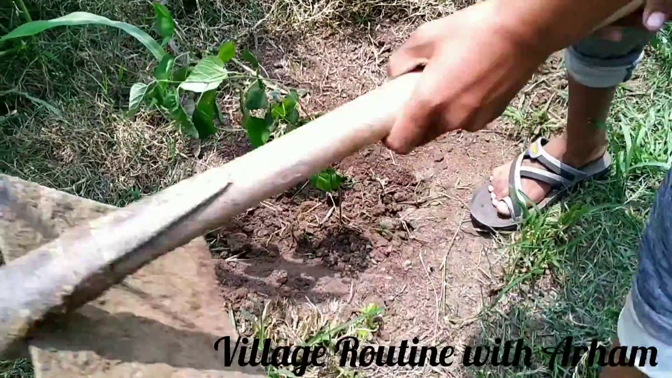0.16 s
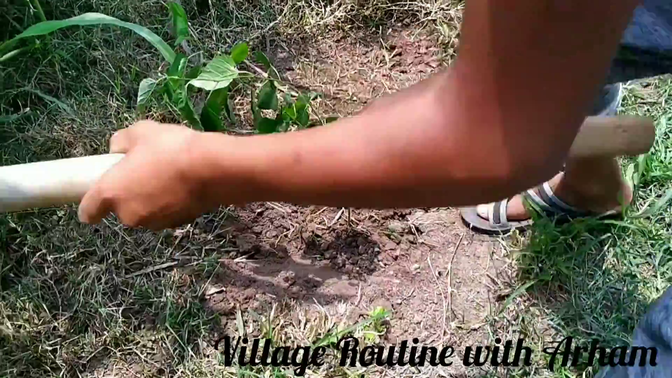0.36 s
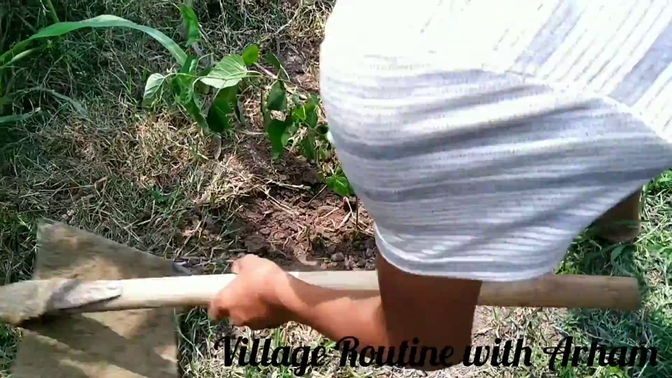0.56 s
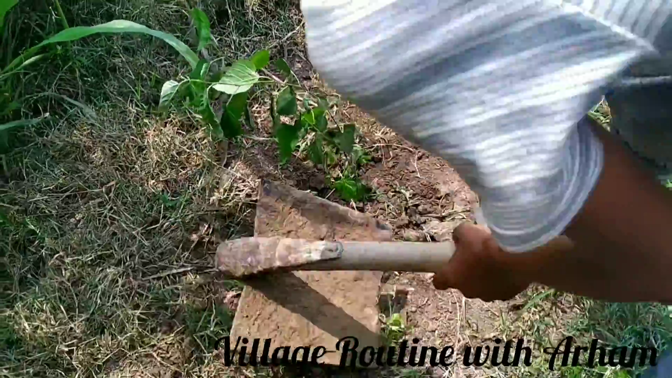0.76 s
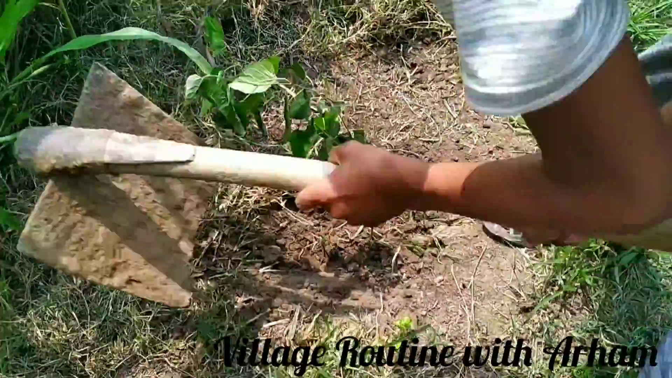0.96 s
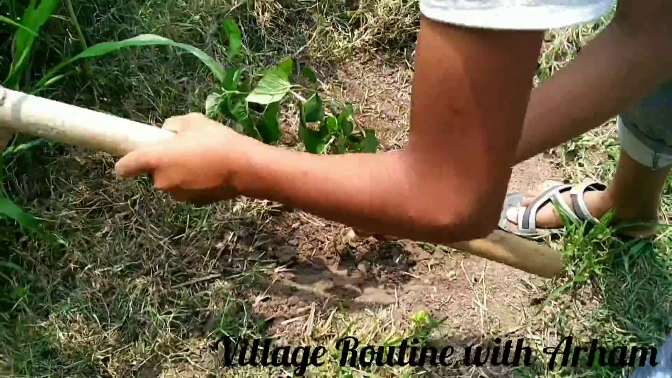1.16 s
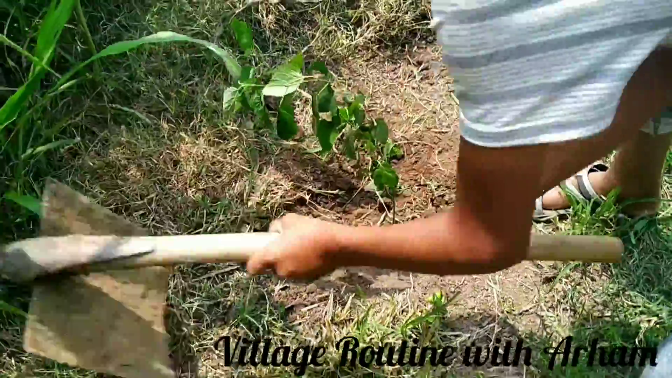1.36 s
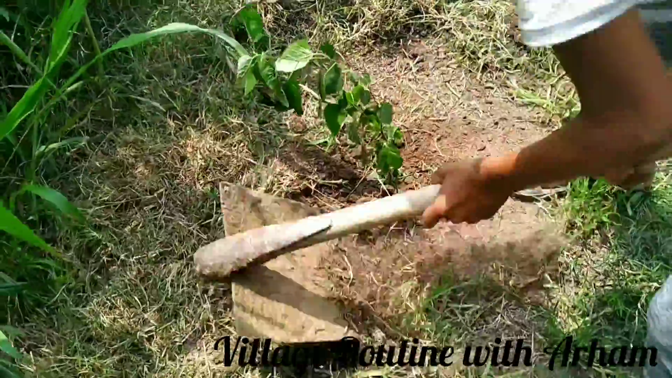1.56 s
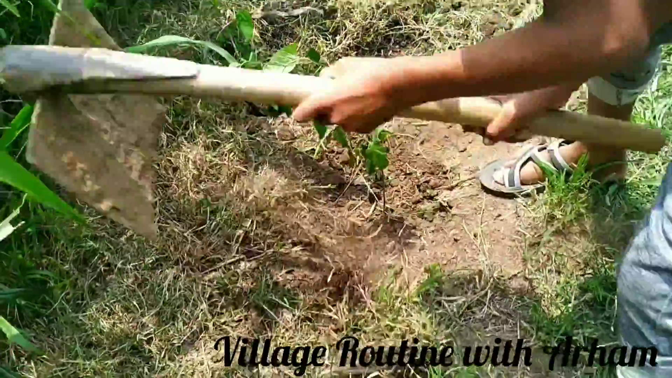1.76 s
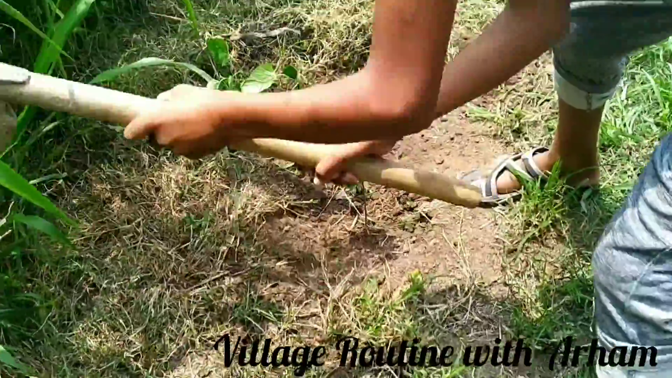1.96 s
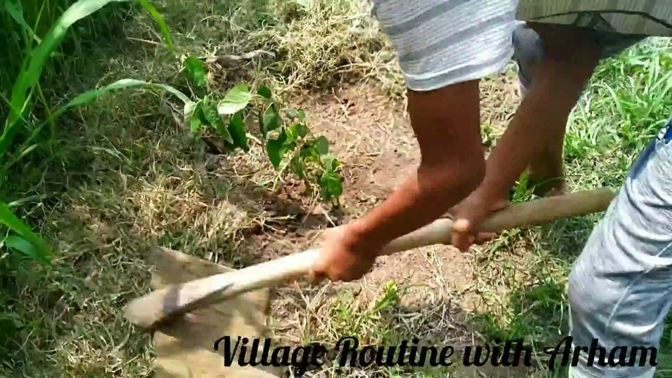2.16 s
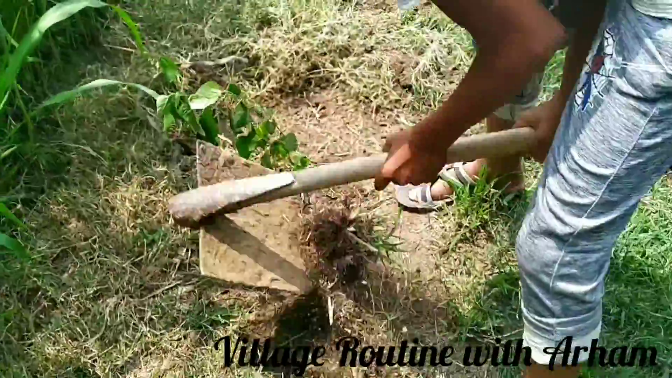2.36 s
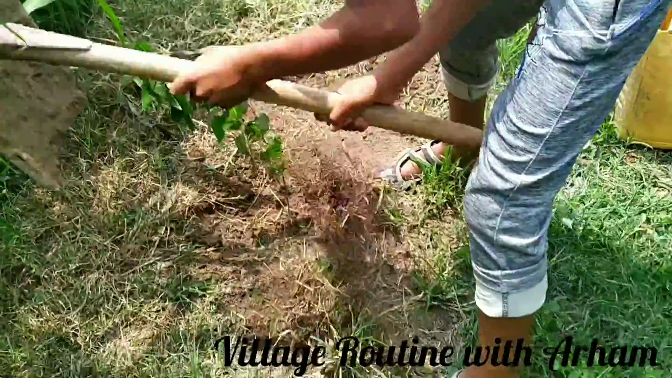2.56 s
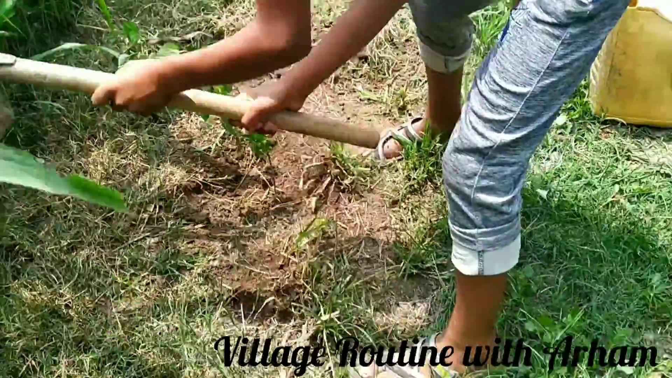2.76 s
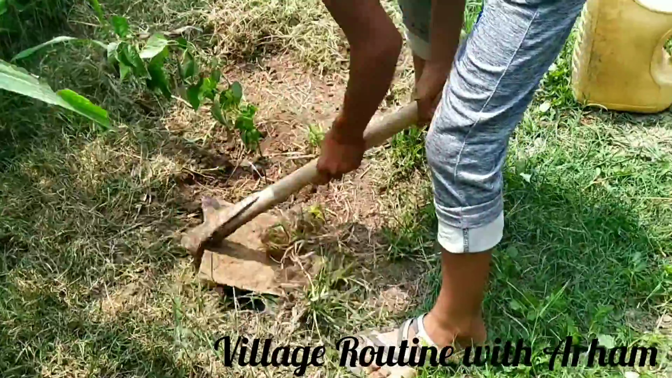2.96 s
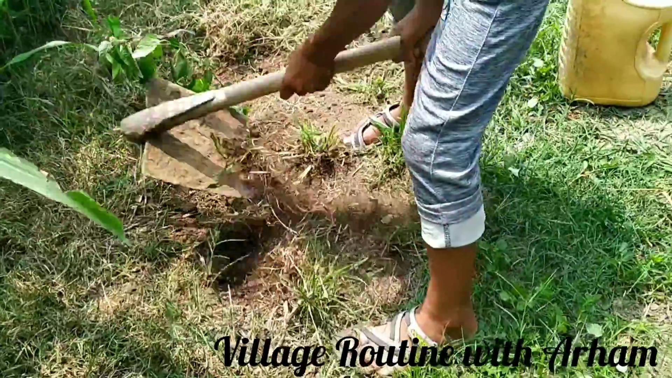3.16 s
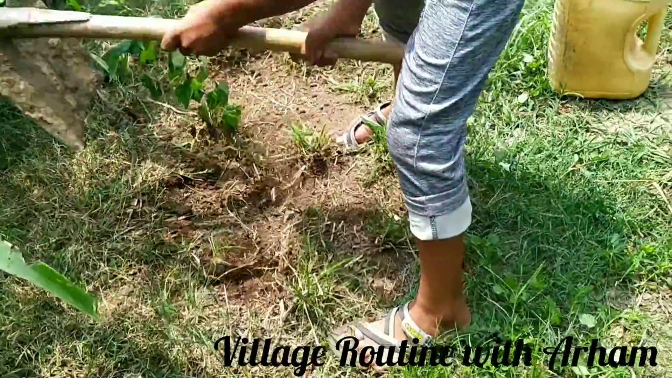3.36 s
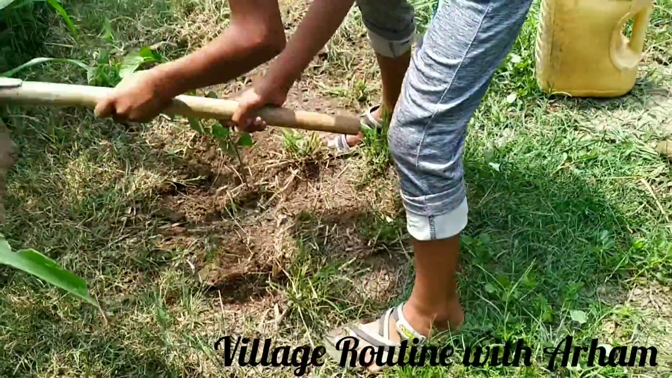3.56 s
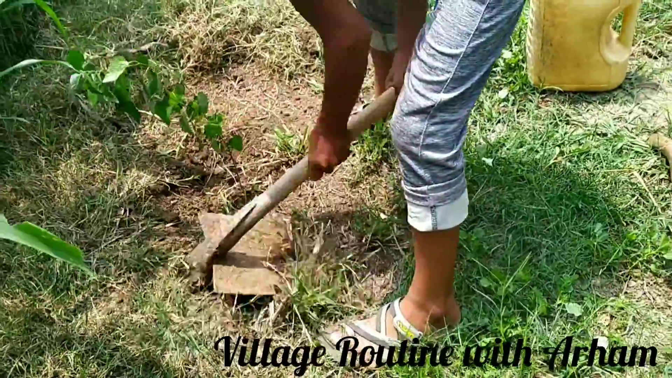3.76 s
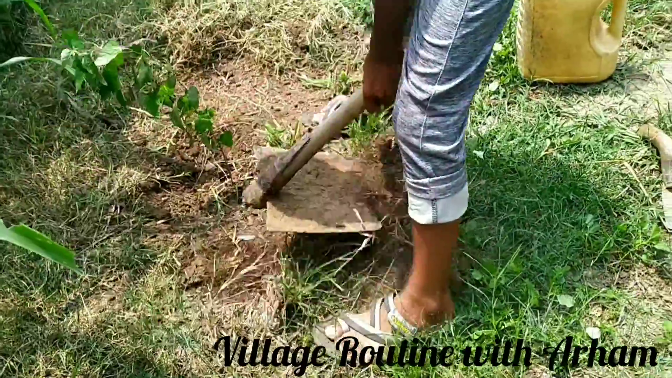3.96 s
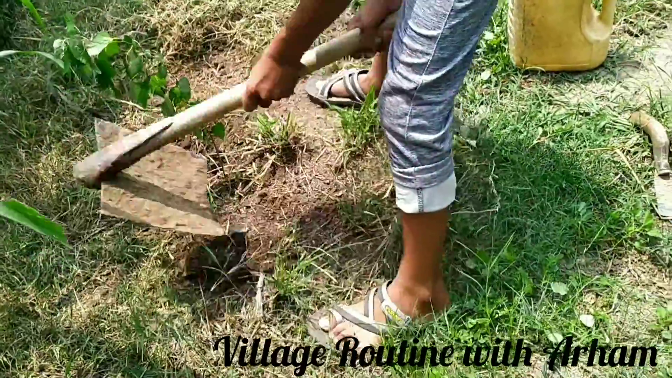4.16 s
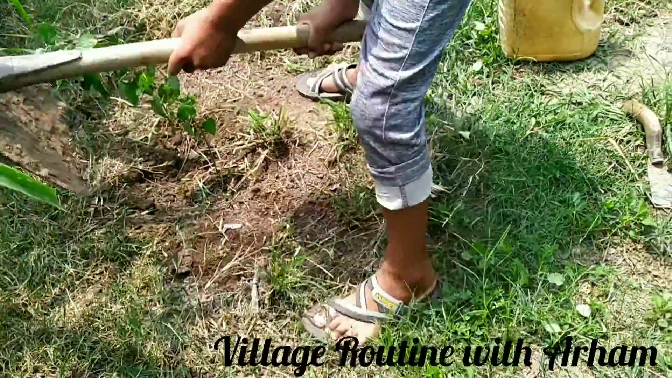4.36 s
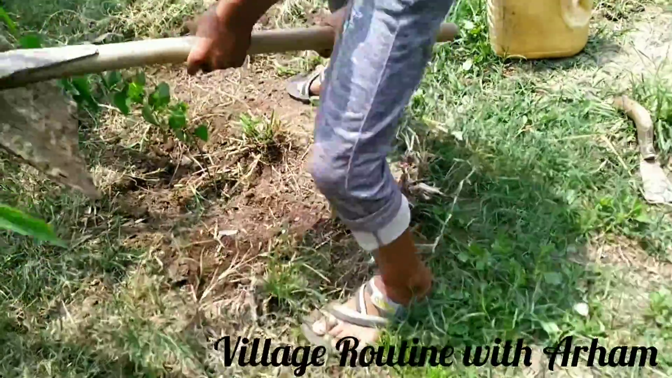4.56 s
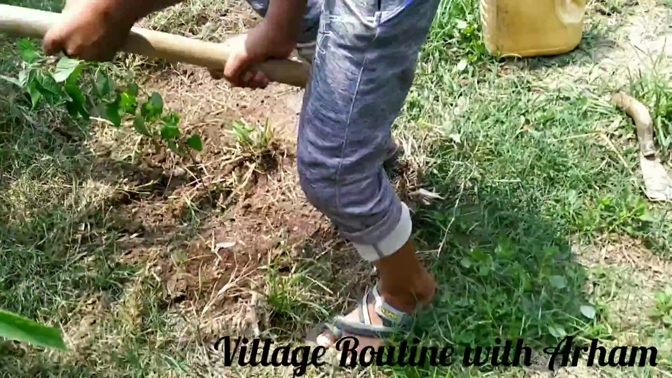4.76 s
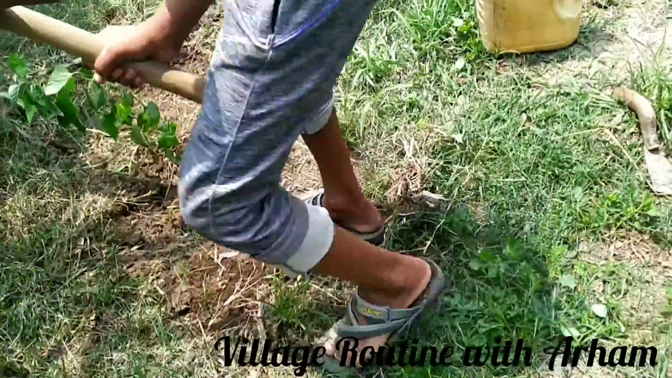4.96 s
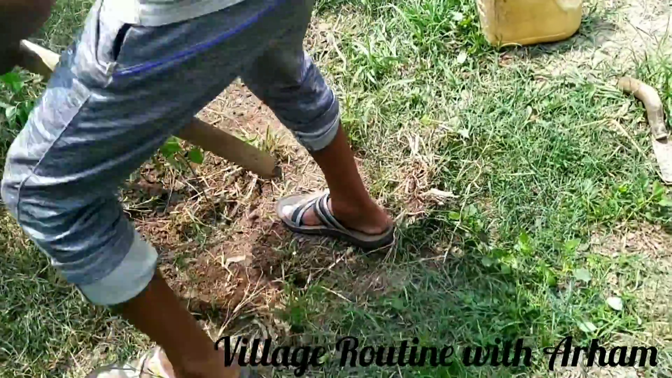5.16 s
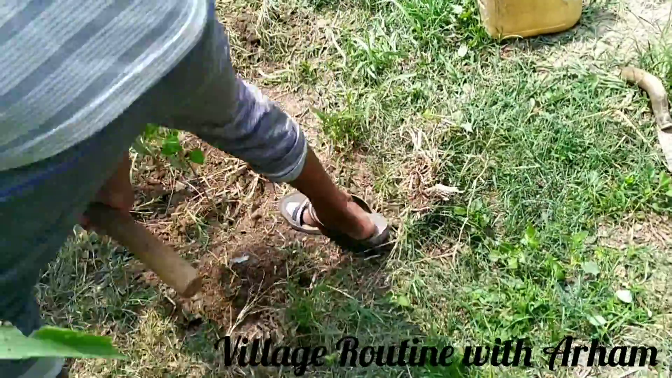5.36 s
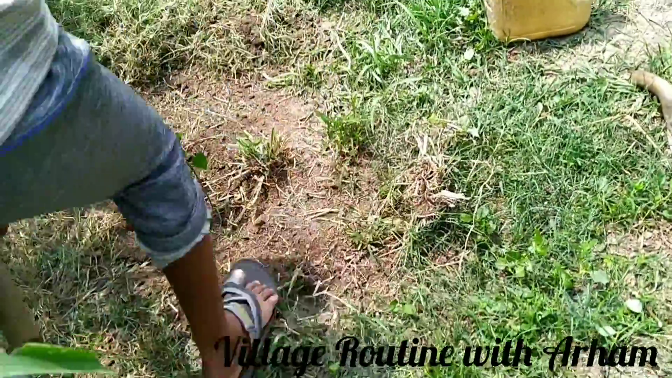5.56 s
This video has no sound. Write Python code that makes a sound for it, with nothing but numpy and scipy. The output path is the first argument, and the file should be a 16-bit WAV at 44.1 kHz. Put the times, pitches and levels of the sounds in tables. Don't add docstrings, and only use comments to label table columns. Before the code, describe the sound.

Five sharp hoe strokes crunch into dry earth outdoors, with crumbs pattering, grit sliding off the blade, and a distant pump engine chugging low.

```python
import sys
import numpy as np
from scipy import signal
from scipy.io import wavfile
from scipy.ndimage import uniform_filter1d

SR = 44100
rng = np.random.default_rng(int(sys.argv[2]) if len(sys.argv) > 2 else 0)


def ratio(d):
    e = np.asarray(d, float) / 20
    return 10 ** e


def int16_out(signal):
    q = np.round(np.clip(np.atleast_2d(signal).T, -1, 1) * 32767)
    wavfile.write(sys.argv[1], SR, q.astype(np.int16))


N = 246959
TIME = np.arange(N) / SR

# peak in seconds, grit level in dB,
# weight (lumps over grit) in dB, rise in ms per 10 dB.
CUTS = [
    (0.647, -24, -10, 8.5),
    (1.454, -28.5, -15, 10),
    (2.224, -26, -9, 17),
    (2.968, -39.5, -12, 26),
    (3.784, -27, -11.5, 12),
]
CUT_FALL_MS = 45.6
# peak in seconds, grit level in dB, weight in dB,
# rise in ms per 10 dB, fall in ms per 10 dB.
STOPS = [
    (0.663, -21, -11, 13.5, 22.5),
    (1.485, -15, -11.5, 15, 15.5),
    (2.246, -15, -11, 9, 19),
    (2.997, -16.5, -7, 9, 16),
    (3.807, -17, -13, 9.5, 17.5),
]
# peak in seconds, grit level in dB, weight in dB,
# rise in ms per 10 dB, fall in ms per 10 dB.
PRIES = [
    (.705, -33, -6.5, 22, 34),
    (1.534, -29, -5, 7, 24.5),
    (2.266, -21.5, -4, 25.5, 13.5),
    (3.037, -24.5, -7.5, 4, 20.5),
    (3.823, -27, -6.5, 13, 8),
]
SPILL_LATE_S, SPILL_DB, SPILL_WEIGHT_DB, SPILL_RISE_MS, SPILL_FALL_MS = 0.037, -17, -19, 5.7, 30
# peak in seconds, grit level in dB, weight in dB, fall in ms per 10 dB (below zero means as short as
SCUFFS = [(2.269, -20, -5, -1), (2.6, -42, -18, 7), (.36, -46, -3, 33), (0.384, -37.5, 2.5, 12.5),
          (.446, -45, -10, 15), (1.098, -40.5, -17, 31), (1.256, -46, -2.5, 7), (1.358, -39, -13, -1),
          (1.948, -53, 1, 15), (4.415, -44.5, -5.5, 39), (4.454, -43.5, -3.5, 29), (4.81, -34, -11, 3),
          (4.837, -43, -21, 13), (4.889, -37.5, -3.5, 12.5), (5.298, -36.5, -17, 46), (5.554, -39, -16, 27)]
SCUFF_RISE = 0.93
# start in seconds, level in dB, ground note in Hz, swell in ms.
THUDS = [(0.38, -33.5, 364, 1.4), (.658, -23, 528, 2.5), (.662, -26, 800, 4.4), (1.48, -20.5, 393, 1.84),
         (1.484, -31.5, 560, 10.7), (1.484, -22.5, 697, 6), (2.244, -19.5, 560, 8.8),
         (2.265, -36, 412, 1.5), (2.993, -25.5, 373, 7.1), (2.995, -26, 560, 4.5), (3.789, -30.5, 110, 5),
         (3.797, -26.5, 560, 5.6), (3.798, -22.5, 343, 2.7), (4.886, -43, 452, 3.1)]
# frequency in Hz, level in dB.
GRIT = [(1060, -65.5), (1800, -37), (2500, -9.5), (3800, -4), (5900, -4), (7600, 1), (9150, -4),
        (10000, -8), (11500, -12.5), (13900, -7), (15600, -6.5), (17000, -42)]
# frequency in Hz, width in Hz, level in dB.
CLOD = [(342, 294, -7), (560, 158, -7.5), (775, 185, -7)]
# frequency in Hz, width in Hz, level in dB.
CRUSH = [(1285, 790, -1), (1460, 126, -4.5), (2036, 810, -8.5), (2480, 430, -8)]
CRUST_SHARE, CRUST_DB = 0.87, 2
# frequency in Hz, time to fall 60 dB in seconds.
BLADE = [(380, .3), (537, .4)]
# start in seconds, level of the low note in dB, level of the high note in dB.
RINGS = [
    (.7, -39, -38),
    (1.53, -40.5, -39.5),
    (2.29, -47.5, -44),
    (3.041, -53, -52),
    (3.819, -54, -57),
]
# start in seconds, length in seconds, level in dB, steel note in Hz.
SLIDES = [
    (3.272, 0.24, -51, 1920),
    (3.438, 0.24, -49.5, 3700),
    (3.864, 0.33, -46, 3610),
    (4.194, 0.17, -58.5, 1860),
    (4.323, 0.33, -49.5, 3580),
]
SLIDE_SAG, SLIDE_LEFT = 0.015, 1
SLIDE_WIDTH_HZ, SLIDE_PEAK = 400, 1.35
UPPER_RATIO, UPPER_WIDTH_HZ, UPPER_DB = 1.45, 3200, 2.5
# time in seconds, patter level in dB.
RUSTLE = [(0, -60), (.05, -83), (.28, -64), (.36, -47), (.6, -55), (1.08, -48), (1.28, -55.5),
          (1.73, -45.5), (1.91, -56), (2.45, -47.5), (3.45, -45.5), (3.7, -52), (4.05, -45), (4.27, -53),
          (4.45, -45.5), (5.07, -51.5), (5.35, -48), (5.6, -42.5)]
# frequency in Hz, level in dB.
RUSTLE_TONE = [(150, -12), (300, -13), (700, -5.5), (1300, -3.5), (2500, 0.5), (4600, -4), (7900, -0.5),
               (9300, -5), (10500, -12.5), (13000, -8.5), (15700, -3.5), (17000, -51)]
EVEN_DB, TILT_DB, TILT_PER_DB = -49.5, 1.5, -0.68
# time in seconds, level in dB.
INSECT = [(0, -58.5), (.25, -56.5), (.48, -47), (.6, -57), (1.36, -46), (1.75, -63), (2.01, -50),
          (2.67, -46.5), (3.02, -72), (3.2, -51.5), (3.6, -58), (3.77, -55), (3.94, -65), (4.15, -60),
          (4.7, -52), (5.2, -52), (5.46, -52), (5.6, -46)]
INSECT_HZ, INSECT_WIDTH_HZ = 8100, 750
# time in seconds, firings a second.
FIRING = [(0, 9.21), (1.8, 9.2), (2.4, 9.15), (3.6, 9.17), (5.6, 9.2)]
FIRST_TURN = .09
# frequency in Hz, level in dB.
EXHAUST = [(15, -67), (25, -47), (37, -22), (53, -5), (70, -4.5), (97, 0), (129, -0.5), (145, -10),
           (165, -15.5), (200, -11), (235, -16), (320, -18), (420, -42), (700, -82)]
# time in seconds, level in dB.
ENGINE = [(0, -46.5), (2.1, -46.5), (3.9, -48), (5.6, -47)]
# frequency in Hz, width in Hz, level in dB.
PIPE = [(73.4, 1.5, -9), (120, 3, -14), (128.5, 3, -14), (197, 6, -24)]
# frequency in Hz, level in dB.
AIR = [(150, -23), (300, -22.5), (600, -27.5), (1200, -32), (3800, -29.5), (9500, -37.5), (10300, -42),
       (16000, -40)]
AIR_DB = -54.5
# frequency in Hz, likeness from 0 to 1.
NEAR_SAME = [(60, 1), (500, 1), (900, 0.7), (1500, 0.55), (4000, 0.71), (15000, 0.33)]
# frequency in Hz, likeness from 0 to 1.
FAR_SAME = [(60, 0.96), (200, .86), (550, 0.51), (1500, 0.21), (6000, 0.93), (9000, 0.48), (15000, .4)]
# frequency in Hz, left over right in dB.
LEFT_PORT = [(100, .3), (500, 1.4), (1300, -.6), (2500, -1.2), (4500, -1.5), (7300, -.5), (10500, -6),
             (14000, -1)]
GAP_SHARE, GAP_DB, GAP_FROM_HZ = .045, -30, 1500


def evened(x):
    return x / np.sqrt(np.mean(x ** 2) + 1e-20)


def read(points, hz):
    f, value = np.transpose(points)
    return np.interp(np.log(hz + 1), np.log(f + 1), value)


def curve(rows):
    t, value = np.transpose(rows)
    return np.interp(TIME, t, value)


def colour(x, points):
    half = np.log(ratio(np.maximum(read(points, np.fft.rfftfreq(16384, 1 / SR)), -100)))
    full = np.concatenate([half, half[-2:0:-1]])
    taps = np.fft.ifft(np.exp(np.conj(signal.hilbert(full)))).real[:8192]
    taps = taps.reshape((1,) * (x.ndim - 1) + (-1,))
    return signal.oaconvolve(x, taps, axes=-1)[..., :N]


def resonate(x, hz, width):
    return signal.lfilter(*signal.iirpeak(hz, hz / width, SR), x)


def grainy(per_s, spread_db, hiss):
    size = ratio(spread_db * np.minimum(rng.exponential(1, (2, N)), 4))
    struck = rng.random((2, N)) < per_s / SR
    cracks = evened(size * rng.standard_normal((2, N)) * struck)
    return evened(cracks + hiss * rng.standard_normal((2, N)))


def flicker(ms):
    size = int(ms * SR / 1000)
    return evened(uniform_filter1d(uniform_filter1d(rng.standard_normal(N), size), size))


def all_pushes():
    cuts = [(*row, CUT_FALL_MS) for row in CUTS]
    spills = [(s + SPILL_LATE_S, db + SPILL_DB, SPILL_WEIGHT_DB, SPILL_RISE_MS, SPILL_FALL_MS)
              for s, db, *_ in PRIES]
    scuffs = [(s, db, weight_db, SCUFF_RISE * ms, ms) for s, db, weight_db, ms in SCUFFS]
    return cuts + list(STOPS) + list(PRIES) + spills + scuffs


def pushes(share):
    power = np.zeros(N)
    for s, db, weight_db, rise_ms, fall_ms in all_pushes():
        i = slice(max(int((s - .2) * SR), 0), int((s + .3) * SR))
        ms = (TIME[i] - s) * 1000
        slope = np.minimum(ms / max(rise_ms, .5), -ms / max(fall_ms, .5))
        power[i] += ratio(2 * (db + share * weight_db + 10 * slope))
    return np.sqrt(power)


def soil():
    shiver = ratio(1.6 * flicker(3))
    grit = evened(colour(grainy(7000, 2.5, 1.0), GRIT))
    crust = sum(ratio(db) * resonate(grainy(1500, 3.1, 0.67), hz, w) for hz, w, db in CRUSH)
    clods = np.zeros((2, N))
    for hz, w, db in CLOD:
        lump = resonate(grainy(700, 2.5, .5), hz, w)
        clods += ratio(db) * resonate(lump, hz, 1.26 * w)
    sound = grit * pushes(0) * shiver
    sound += ratio(CRUST_DB) * evened(crust) * pushes(CRUST_SHARE) * shiver
    return sound + ratio(-2.0) * evened(clods) * pushes(1)


def thuds():
    out = np.zeros(N)
    for s, db, hz, ms in THUDS:
        t = np.maximum(TIME - s, 0)
        swell = t * 1000 / ms
        out += ratio(db + 2) * np.sin(2 * np.pi * hz * t) * swell * np.exp(.5 - swell ** 2 / 2)
    return out


def blade():
    out = np.zeros(N)
    clinging_db = 5 * flicker(7) - 3.5
    for s, *levels_db in RINGS:
        t = np.maximum(TIME - s, 0)
        onset = 1 - np.exp(-t / 0.0014)
        for db, (hz, t60) in zip(levels_db, BLADE):
            out += ratio(db - 60 * t / t60 + clinging_db) * np.sin(2 * np.pi * hz * t) * onset
    return out


def hoe():
    sound = soil()
    sound[0] += thuds() + blade()
    return ports(sound, NEAR_SAME, lag_ms=0.2745, sway_ms=0.088, echo_db=1.5, drift_ms=0.1155, corner_hz=1040)


def slides():
    grains = grainy(2500, 3.8, 1.0)
    out = np.zeros((2, N))
    for s, length, db, hz in SLIDES:
        i = slice(int(s * SR), int((s + length) * SR))
        part = grains[:, i]
        along = np.linspace(0, 1, part.shape[1])
        turn = np.exp(2j * np.pi * np.cumsum(hz * (1 - SLIDE_SAG * along)) / SR)
        narrow = (turn * signal.lfilter(*signal.butter(2, SLIDE_WIDTH_HZ / 2, fs=SR), part / turn)).real
        upper_hz = hz * UPPER_RATIO
        wide = resonate(resonate(part, upper_hz, UPPER_WIDTH_HZ), upper_hz, 2 * UPPER_WIDTH_HZ)
        arch = np.sin(np.pi * along ** SLIDE_PEAK) ** 0.63
        out[:, i] += ratio(db) * arch * (evened(narrow) + ratio(UPPER_DB) * evened(wide))
    out[1] = SLIDE_LEFT * out[0] + 1.04 * out[1]
    return out * ratio(0.6 * flicker(12))


def rustle():
    patter = evened(colour(grainy(1800, 3.0, 1.7), RUSTLE_TONE))
    low = signal.sosfilt(signal.butter(2, 2500, fs=SR, output="sos"), patter)
    busy_db = curve(RUSTLE)
    patter = patter + low * (ratio(TILT_DB + TILT_PER_DB * (busy_db - EVEN_DB)) - 1)
    return patter * ratio(busy_db + 1.3 * flicker(25) + 1.2 * flicker(6) + 1.1)


def insect():
    buzz = resonate(rng.standard_normal((2, N)), INSECT_HZ, INSECT_WIDTH_HZ)
    buzz = resonate(buzz, INSECT_HZ, INSECT_WIDTH_HZ)
    return evened(buzz) * ratio(curve(INSECT) + 3.2 * flicker(16) - 1.5)


def engine():
    turns = FIRST_TURN + np.cumsum(curve(FIRING)) / SR
    size = ratio(1.8 * rng.standard_normal((60, 3)))[turns.astype(int)].T
    firing = np.diff(np.floor(turns), prepend=0) * size[0]
    valves = np.zeros(N)
    for knock_size, at in zip(size[1:], (.5, .76)):
        valves += np.diff(np.floor(turns + at), prepend=0) * knock_size
    pulses = evened(firing + .18 * valves) * [[1], [0]]
    pulses = signal.sosfilt(signal.butter(2, 190, fs=SR, output="sos"), pulses)
    roll = rng.standard_normal((2, N)) * ratio(2 * flicker(30))
    drive = .85 * roll - pulses
    sound = evened(colour(drive, EXHAUST))
    sound += sum(ratio(db) * evened(resonate(drive, hz, w)) for hz, w, db in PIPE)
    return evened(sound) * ratio(curve(ENGINE))


def air():
    return ratio(AIR_DB) * evened(colour(rng.standard_normal((2, N)), AIR))


def ports(pair, same, lag_ms, sway_ms, echo_db, drift_ms, corner_hz):
    hz, t, (shared, apart) = signal.stft(pair, SR, nperseg=512, noverlap=384)
    hz = hz[:, None]
    likeness = np.clip(read(same, hz), 0, 1)
    at = np.minimum(t * SR, N - 1).astype(int)
    treble = hz ** 2 / (hz ** 2 + corner_hz ** 2)
    echo = treble * ratio(echo_db)
    lag = (lag_ms + sway_ms * flicker(300)[at]) / 1000
    out = []
    for side in (1, -1):
        path = np.exp(-1j * np.pi * hz * treble * side * lag)
        for ms in rng.uniform(.3, 4, 3):
            delay = (ms + drift_ms * flicker(200)[at]) / 1000
            path = path + echo * np.exp(-2j * np.pi * hz * delay)
        path = path / np.sqrt(1 + 3 * echo ** 2)
        mixed = np.sqrt((1 + likeness) / 2) * shared + side * np.sqrt((1 - likeness) / 2) * apart
        out.append(mixed * path * ratio(side * read(LEFT_PORT, hz) / 2))
    return signal.istft(np.array(out), SR, nperseg=512, noverlap=384)[1][:, :N]


def scene():
    field = slides() + rustle() + insect() + engine() + air()
    return hoe() + ports(field, FAR_SAME, lag_ms=0.19, sway_ms=0.053, echo_db=-3.0, drift_ms=0.145, corner_hz=1170)


def drop_bands(x):
    hz, _, (left, right) = signal.stft(x, SR, nperseg=1024, noverlap=768)
    field = rng.standard_normal(left.shape)
    for bands, frames in ((6, 18), (4, 8)):
        field = uniform_filter1d(uniform_filter1d(field, size=bands, axis=0), size=frames, axis=1)
    shut = (field < np.quantile(field, GAP_SHARE)) & (hz[:, None] > GAP_FROM_HZ)
    lost = (left + right) / 2 * shut * (1 - ratio(GAP_DB))
    return x - signal.istft(lost, SR, nperseg=1024, noverlap=768)[1][:N]


def roll_off(x):
    return signal.sosfilt(signal.butter(12, 16870, fs=SR, output="sos"), x)


def record(dry):
    rounded = drop_bands(.7 * np.tanh(dry / .7))
    edge = signal.firwin(1535, 15920, window=("kaiser", 9), fs=SR)
    mix = signal.oaconvolve(rounded, edge[None], "same")
    return roll_off(mix)


dry = scene()
out = record(dry)
int16_out(out)
```